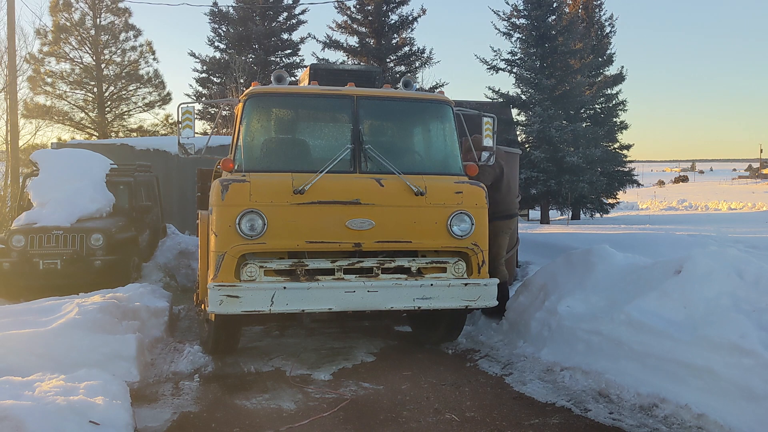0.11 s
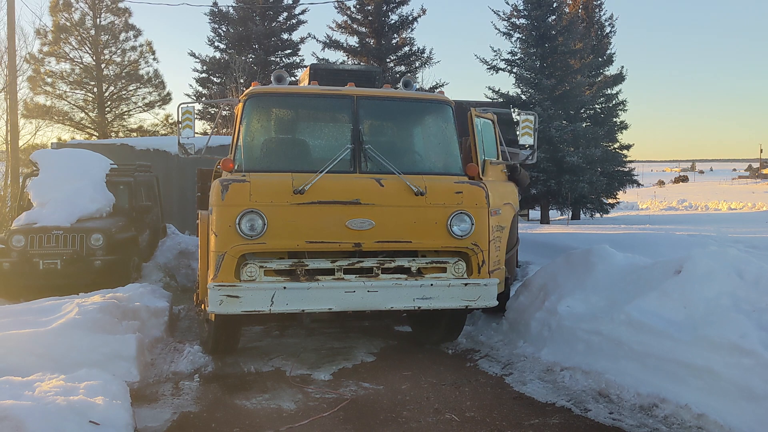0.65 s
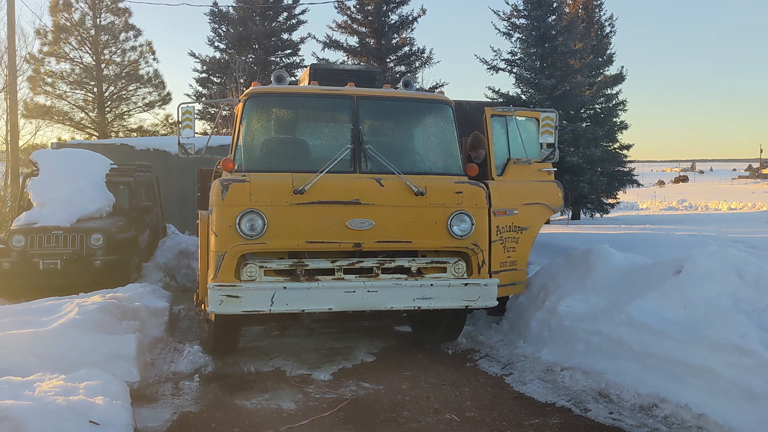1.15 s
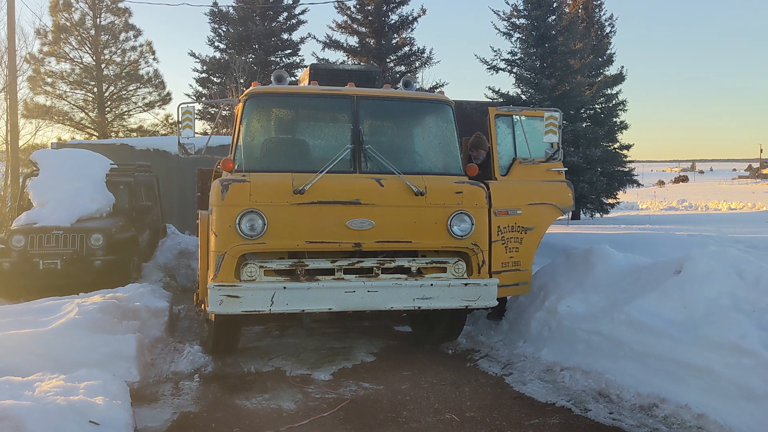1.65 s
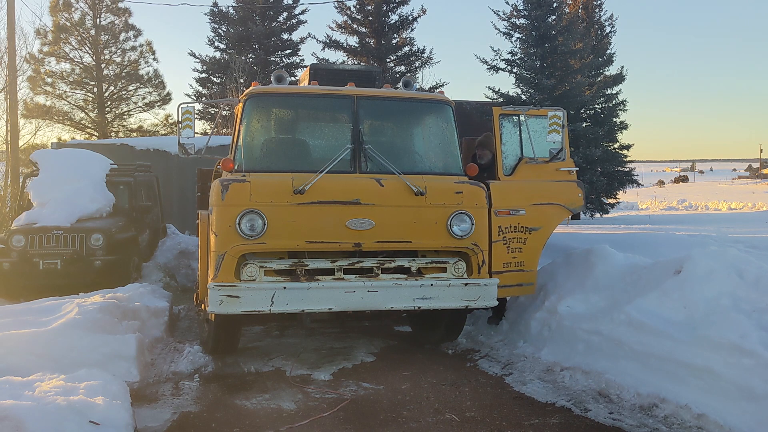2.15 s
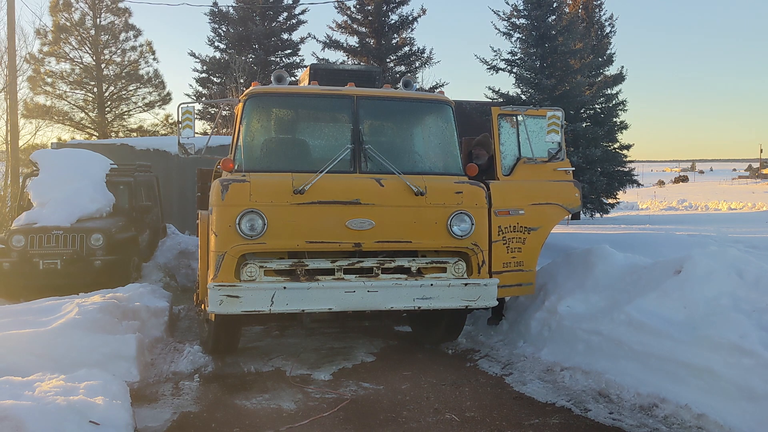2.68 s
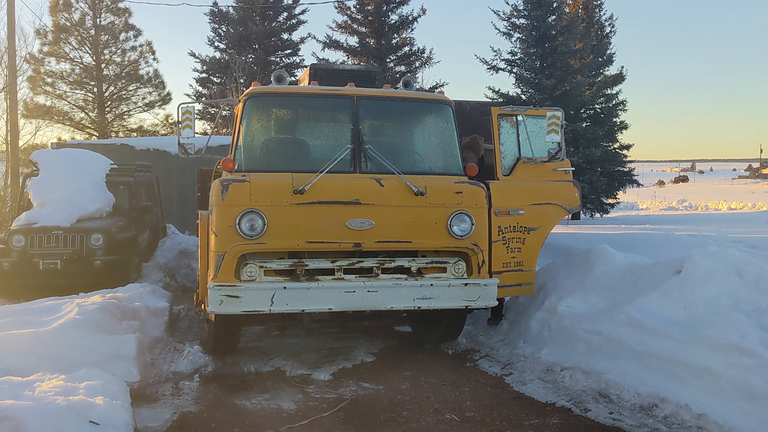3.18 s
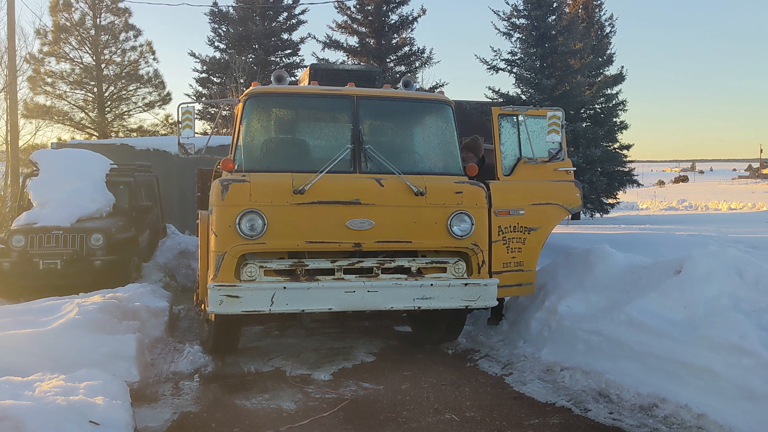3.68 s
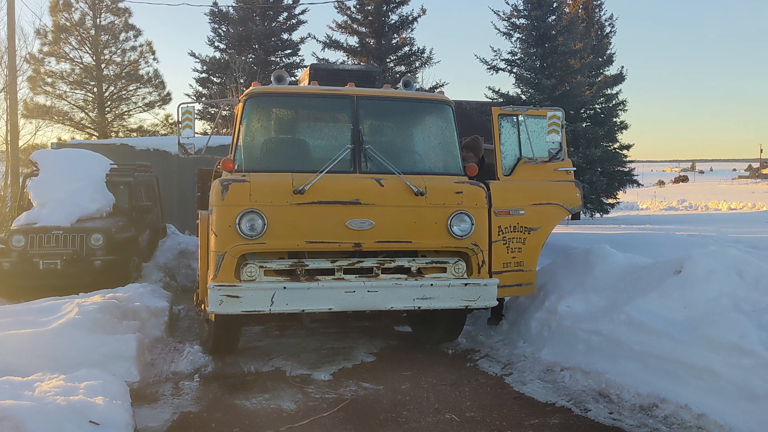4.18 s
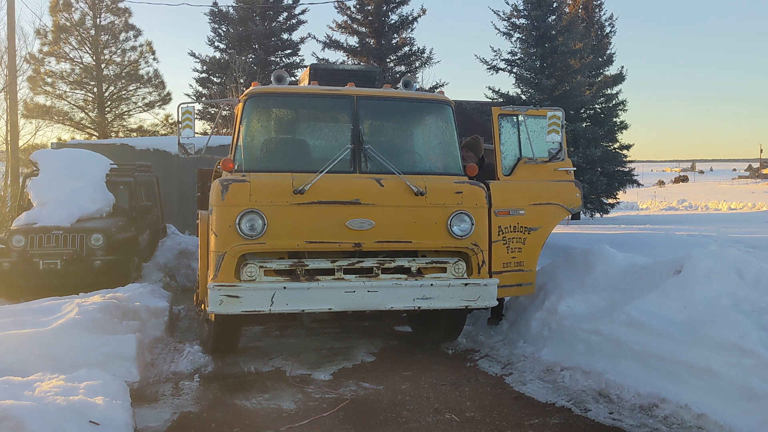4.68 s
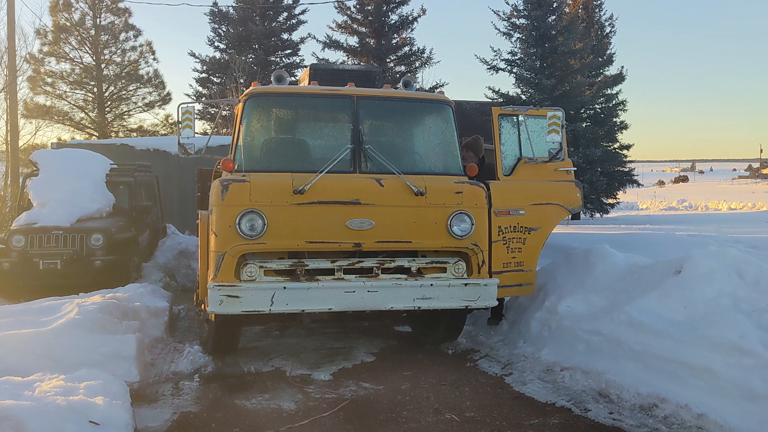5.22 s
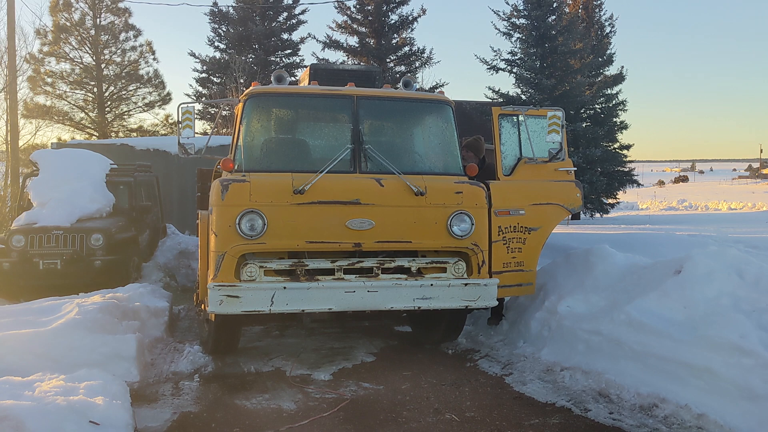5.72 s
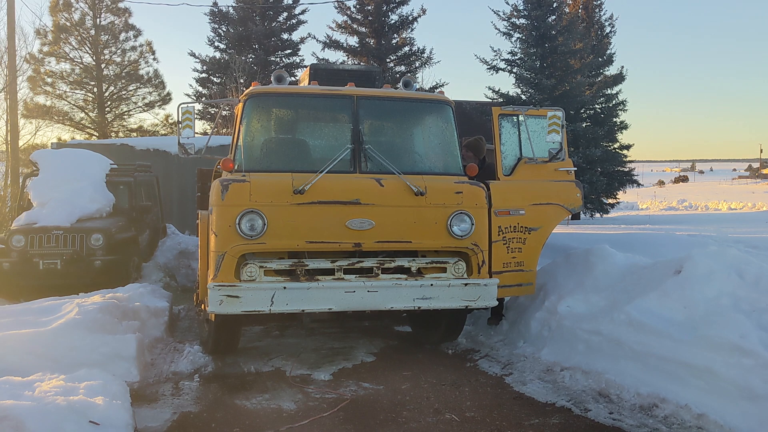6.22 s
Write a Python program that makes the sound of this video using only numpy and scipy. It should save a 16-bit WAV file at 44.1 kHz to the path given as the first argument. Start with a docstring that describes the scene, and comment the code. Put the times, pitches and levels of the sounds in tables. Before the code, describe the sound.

In a quiet winter yard, soft steps and a sheet-metal cab knock lead to sudden hissing air, a starter slam and rough, clattering diesel cranking.

```python
"""Cold diesel start in a winter yard

Boots crunch on frozen ground, then someone climbs into a truck cab; a small bird chips twice.
Showers of tiny impacts through resonances make the boots, cab and engine; gliding sines make the bird.
Air starts to hiss: noise through narrow resonances. The starter slams in with a short tone and hard
knocks, and the cold diesel turns over unevenly, with a falling first thump and trembling metal tones.
Behind it all lie a far rumble and a faint steady hiss, both made of filtered noise."""
import sys
import numpy as np
from scipy import signal
from scipy.fft import rfft, irfft
from scipy.io import wavfile

SR = 44100
rng = np.random.default_rng(int(sys.argv[2]) if len(sys.argv) > 2 else 0)


def decibels_to_gain(level_db):
    """Convert a level in decibels to a linear amplitude gain (20 dB per decade)."""
    exponent = np.asarray(level_db, float) / 20
    return 10 ** exponent


def inscribe(sig):
    """Save sig as 16-bit PCM at rate SR to the path in sys.argv[1].

    A 1-D sig is mono; a 2-D sig holds one channel per row.
    Samples are clipped to [-1, 1] before scaling.
    """
    pcm = np.round(np.clip(np.atleast_2d(sig).T, -1, 1) * 32767)
    wavfile.write(sys.argv[1], SR, pcm.astype(np.int16))


N = 280035
T = np.arange(N) / SR
HZ = np.maximum(np.arange(N // 2 + 1) * SR / N, 1)
QUARTER_TURN = [[0], [np.pi / 2]]   # phase offset [rad] between the two signals of a pair


def at_hz(points):
    """Reads a table at every frequency of the transform, along a logarithmic pitch scale."""
    hz, value = np.array(points).T
    return np.interp(np.log(HZ), np.log(hz), value)


def rms_one(x):
    """Scales a sound to an average strength (rms) of 1."""
    return x / np.sqrt(np.mean(x ** 2) + 1e-20)


def noise_pair():
    """Two unrelated white noises."""
    return rng.standard_normal((2, N))


def drift(rate_hz):
    """Slow random wandering of spread 1, worked out at every 40th sample."""
    r = np.exp(-2 * np.pi * rate_hz * 40 / SR)
    steps_of_chance = rng.standard_normal(N // 40 + 2002)
    slow = signal.lfilter([1], [1, -2 * r, r * r], steps_of_chance)[2000:]
    return np.interp(np.arange(N) / 40, np.arange(len(slow)), rms_one(slow))


def grains(per_s, spread_db):
    """Two unrelated showers of tiny impacts of uneven size."""
    hit = rng.random((2, N)) < per_s / SR
    size = decibels_to_gain(spread_db * np.minimum(rng.exponential(1, (2, N)), 4))
    return hit * size * noise_pair() + 1e-18


def band(x, low_hz, high_hz):
    """Keeps the sound between two pitches."""
    return signal.sosfilt(signal.butter(2, [low_hz, high_hz], "band", fs=SR, output="sos"), x)


def body(x, spectrum, rings, rings_db, waver_db):
    """Broad colour plus resonances; each resonance is driven with a wavering strength of its own."""
    broad = irfft(rfft(x) * decibels_to_gain(at_hz(spectrum)), N)
    ringing = 0
    for hz, width_hz, db in rings:
        r = np.exp(-np.pi * width_hz / SR)
        poles = [1, -2 * r * np.cos(2 * np.pi * hz / SR), r * r]
        gain = (1 - r * r) / 2
        driven = x * decibels_to_gain(db + waver_db * drift(4.7))
        ringing = ringing + signal.lfilter([gain, 0, -gain], poles, driven)
    return broad + decibels_to_gain(rings_db) * ringing


def bursts(start_s, level_db, rise_s, t60_s, held_s=0):
    """Power of blows that rise quickly, hold a moment and die away by 60 dB in t60_s."""
    power = np.zeros(N)
    for s, db, rise, t60, held in np.broadcast(start_s, level_db, rise_s, t60_s, held_s):
        i = max(int(np.ceil(s * SR)), 0)
        t = T[i:i + int((held + 2 * t60) * SR)] - s
        attack = 1 - np.exp(-t / max(rise, 1e-4))
        fade = decibels_to_gain(db - 60 * np.maximum(t - held, 0) / t60)
        power[i:i + len(t)] += (fade * attack) ** 2
    return power


def blows(s, low_db, mid_db, high_db, held, t60, sound, rise, low_longer, high_shorter):
    """Each blow sounds in three ranges, each with its own fade; the lows swell up more slowly."""
    s = s - .003   # the scrape of contact leads the blow
    low_power = bursts(s, low_db, 2 * rise, low_longer * t60, held)
    mid_power = bursts(s, mid_db, rise, 1.06 * t60, held)
    high_power = bursts(s, high_db, rise, high_shorter * t60, held)
    low = rms_one(band(sound, 94, 846)) * np.sqrt(low_power)
    mid = rms_one(band(sound, 627, 2630)) * np.sqrt(mid_power)
    high = rms_one(band(sound, 4000, 19845)) * np.sqrt(high_power)
    return low + mid + high


# the turning engine: (time [s], exhaust and block level [dB], gears and valves level [dB]),
# each range of pitch shifts these levels a little
ENGINE_TURNING = [(4.44, -55, -50), (4.5, -57, -37), (4.62, -34, -38), (4.75, -36, -33),
                  (4.898, -29.5, -30.5), (5.05, -40, -33.5), (5.18, -32, -33.5), (5.6, -31.5, -31.5),
                  (6.03, -30.5, -33), (6.35, -34, -30)]
# hard knocks: (time [s], block level [dB], exhaust level [dB], metal level [dB], basic t60 [s])
HARD_KNOCKS = [(4.406, -27.5, -58, -20.5, 0.12), (4.454, -30, -27, -13.5, 0.1), (4.47, -9, -25, -7.5, 0.16),
               (4.498, -12, -12.5, -12.5, 0.22), (4.522, -8.5, -12, -24, 0.095), (4.7, -28, -44, -31, 0.15),
               (4.794, -22, -46, -34, 0.13), (4.876, -12, -19, -15, 0.1), (4.957, -22.5, -22.5, -20, 0.21),
               (4.989, -23, -38, -16.5, 0.093), (5.064, -19.5, -20, -18.5, 0.16),
               (5.121, -21.5, -27, -21.5, 0.19), (5.237, -27, -26, -11.5, 0.071),
               (5.445, -14.5, -20, -13, 0.082), (5.529, -35, -43, -19, 0.13),
               (5.674, -20.5, -41, -14, 0.095), (5.729, -36, -29.5, -15, 0.14),
               (5.822, -15.5, -30, -14.5, 0.11), (5.891, -22, -18.5, -16.5, 0.12),
               (5.983, -17.5, -44, -24, 0.06), (6.023, -31, -34, -27.5, 0.69),
               (6.268, -17, -15, -19.5, 0.12), (6.31, -19, -15, -20, 0.12)]
# broad colour of the engine: (pitch [Hz], relative level [dB])
ENGINE_COLOUR = [(24, -35), (40, -7), (200, -8.5), (256, -0.5), (554, -2), (933, -4.5), (1020, -2.5),
                 (1250, -19), (1540, -5), (2310, -4.5), (2530, -12.5), (3250, -2), (3600, -4), (4500, -9),
                 (5590, -21.5), (7510, -37.5), (9000, -18.5), (11700, -25), (19800, -120)]
# engine resonances: (pitch [Hz], width [Hz], relative level [dB])
ENGINE_RESONANCES = [(70, 12, -4), (149, 32, -6), (229, 65, -1.5), (342.5, 19, 2.5), (375, 21, -31),
                     (484, 33, -8), (653, 100, -16.5), (1041, 17, 0), (1192, 96, -5), (1385, 16, -4),
                     (2289, 40, -4.5), (2677, 72, -10.5), (2907, 19, -2), (3926, 35, -0.5),
                     (4370, 260, -12), (4990, 97, -14)]


def engine():
    """Dense metal contacts drive the engine's resonances; knocks push each part harder for a moment."""
    sound = body(grains(5000, 2.8), ENGINE_COLOUR, ENGINE_RESONANCES, 2.5, 1.6)
    s, deep, gears = np.transpose(ENGINE_TURNING)
    deep_db, gears_db = np.interp(T, s, deep), np.interp(T, s, gears)
    at, block_db, exhaust_db, metal_db, t60 = np.transpose(HARD_KNOCKS)
    rattle_db = gears_db - 9.5 + 2.5 * (T - s[0])   # the rattle grows by 2.5 dB per second
    # exhaust, block, housing, valves, rattle:
    # (low [Hz], high [Hz], running [dB], flutter [dB], knock [dB], rise [s], t60 factor)
    parts = [(44.3, 273, deep_db - 0.1, 1.65, exhaust_db, 0.0084, 1.21),
             (292.5, 760, deep_db + 0.1, 2.9, block_db, 0.0031, 1.13),
             (974, 1470, gears_db + 0.1, 0.55, metal_db - 1.0, 0.0051, 0.68),
             (1750, 2846, gears_db - 0.6, 1.27, metal_db - 5.5, 0.0039, 0.8),
             (3100, 12200, rattle_db, 2.08, metal_db - 12.5, 0.0054, 1.06)]
    spinning = np.clip((T - s[0]) / .05, 0, 1)
    # 50 lighter taps at random moments shake the whole engine
    moment, strength = rng.random((50, 2)).T
    tap_s = s[0] + moment * (s[-1] - s[0])
    tap_db = 7 + 9 * (strength - 1)   # from -2 to 7 dB over the running level
    tapping = np.sqrt(1 + bursts(tap_s, tap_db, 0.0024, 0.07))
    out = 0
    for low_hz, high_hz, running_db, flutter_db, knock_db, rise, longer in parts:
        running = spinning * tapping * decibels_to_gain(running_db + flutter_db * drift(21.6))
        knocking = bursts(at, knock_db, rise, longer * t60)
        out = out + rms_one(band(sound, low_hz, high_hz)) * np.sqrt(running ** 2 + knocking)
    return out


# first exhaust beat: (time [s], pitch [Hz], level before a random waver [dB])
FIRST_BEAT = [(4.49, 307.7, -49), (4.511, 254, -25), (4.534, 213, -15), (4.571, 165, -22),
              (4.61, 133, -28.5), (4.67, 106, -44)]


def thump():
    """The first heavy beat falls in pitch as the exhaust empties: a sine and its octave."""
    s, hz, db = np.transpose(FIRST_BEAT)
    phase = 2 * np.pi * np.cumsum(np.interp(T, s, hz)) / SR
    beat = np.sin(phase) + 0.26 * np.sin(2 * phase + 0.81)
    level_db = np.interp(T, s, db, left=-120, right=-120) + 3.5 * drift(42.0)
    return decibels_to_gain(level_db) * beat * [[1], [1]]


# castings that sing on and off: one centre pitch [Hz] each
CASTING_HZ = [549, 1183, 1268, 2075, 3300]
# faint hum of each casting between its swells: level before wavering [dB]
CASTING_HUM_DB = [-40.5, -42.5, -39, -54, -52]
# swells, one list per casting: (loudest time [s], level before trembling [dB],
# time to change by 10 dB [s], never taken below 0.01)
CASTING_SWELLS = [
    [(4.5, -21.5, 0.0476), (4.97, -34.5, 0.063), (5.072, -33.5, 0.0735), (5.455, -25.5, 0.01),
     (5.81, -36.5, 0.0625), (6.34, -23, 0.026)],
    [(4.5, -30, 0.0743), (4.726, -31, 0.0719), (4.852, -41, 0.06), (5.684, -36, 0.06), (5.836, -36, 0.06),
     (5.904, -28, 0.0766), (6.03, -32.5, 0.0636)],
    [(4.5, -19.5, 0.0262), (4.62, -37, 0.0265), (4.74, -24.5, 0.0534), (4.91, -23.5, 0.0413),
     (5.18, -31, 0.1036), (5.71, -23, 0.0323), (5.93, -26, 0.04), (6.33, -26, 0.0277)],
    [(4.64, -32.5, 0.07), (4.81, -24, 0.0025), (4.966, -31, -0.01), (5.072, -26.5, -0.026),
     (6.2, -29, -0.09)],
    [(5.072, -41, 0.0628), (5.238, -39.5, 0.09), (5.57, -35, 0.0956), (5.784, -34.5, 0.0733),
     (5.936, -38, 0.1061), (6.3, -38, 0.13)],
]


def singing():
    """Castings as near-steady tones whose pitch and strength tremble; each hums and now and then swells."""
    out, turning = 0, T > ENGINE_TURNING[1][0]
    for hz, hum_db, swells in zip(CASTING_HZ, CASTING_HUM_DB, CASTING_SWELLS):
        phase = 2 * np.pi * np.cumsum(hz * (1 + .009 * drift(30.0))) / SR
        tremble = decibels_to_gain(3.2 * drift(50.0))
        level = turning * decibels_to_gain(hum_db + 5 * drift(17.5))
        for s, db, fade_s in swells:
            level = level + decibels_to_gain(db - 10 * np.abs(T - s) / max(fade_s, .01))
        out = out + level * tremble * np.sin(phase + QUARTER_TURN)
    return out


# the starter gear strikes the flywheel: (time [s], pitch [Hz], level [dB], rise [s], t60 [s])
STARTER_STRIKE = (4.406, 1268, -13, .008, .17)


def starter_bark():
    """The struck flywheel gives one steady tone that rises quickly and dies away."""
    at, hz, db, rise, t60 = STARTER_STRIKE
    return np.sqrt(bursts([at], db, rise, t60)) * np.sin(2 * np.pi * hz * T + QUARTER_TURN)


# escaping air: (time [s], level [dB])
AIR_LEVEL = [(3.76, -39), (3.95, -37.5), (4.4, -38.5), (5.2, -37), (6.35, -36.5)]
# broad colour of the hiss: pitches [Hz], and the relative level [dB] at each
AIR_COLOUR_HZ = [90, 160, 520, 1100, 2200, 3000, 4300, 6500, 7000, 8500, 8900, 10000, 12200, 12700, 14200,
                 15700]
AIR_COLOUR_DB = [-24, -5.5, -12, -3.5, -9.5, -13.5, -10.5, -12, -4.5, -2.5, -14, -15, -9, -25.5, -2.5, -9.5]
# narrow resonances of an opening and its pipe: pitches [Hz]
AIR_RESONANCE_HZ = [463, 640, 743, 1043, 1108, 1204, 1270, 1431, 1750, 2155, 3960, 5340, 6080, 7060, 7206,
                    7697, 8435, 9140, 10720, 12650, 13100, 13400, 13900]
# the same resonances in the same order: (width [Hz], relative level [dB])
AIR_RESONANCES = [(15.9, 2), (32.4, -1.5), (21.6, 2), (23.148, 2), (27, -1), (23.148, -6), (18.519, 3.5),
                  (18.3, 2.5), (32.4, -4), (27.778, 3.5), (88.5, -6), (54, -5.5), (40.741, -9.5),
                  (74.074, -2), (46.296, -3), (37.8, -2), (40, -3), (111.11, -10), (98, -17), (120, 0.5),
                  (70, -1), (90, 2), (159, -29)]


def air_hiss():
    """Smooth turbulence through the narrow resonances of a small opening and its pipe."""
    s, db = np.transpose(AIR_LEVEL)
    opening = np.clip((T - 3.756) / .009, 0, 1)   # opens at 3.756 s, within 9 ms
    colour = np.column_stack([AIR_COLOUR_HZ, AIR_COLOUR_DB])
    rings = np.column_stack([AIR_RESONANCE_HZ, AIR_RESONANCES])
    jet = body(noise_pair(), colour, rings, 2.2, 1.0)
    return rms_one(jet) * opening * decibels_to_gain(np.interp(T, s, db))


# bright puffs as the starter bites: (time [s], level [dB], rise [s], t60 [s])
STARTER_PUFFS = [(4.455, -27, 0.0016, 0.21), (4.484, -26, 0.015, 0.19)]


def puffs():
    """Short bursts of bright noise."""
    s, db, rise, t60 = np.transpose(STARTER_PUFFS)
    return rms_one(band(noise_pair(), 1700, 12600)) * np.sqrt(bursts(s, db, rise, t60))


# blows on the cab's sheet metal: (time [s], level [dB], weight [dB], basic t60 [s])
CAB_BLOWS = [(1.791, -65, 8, 0.11), (1.817, -27, -4.5, 0.15), (1.87, -22, -5, 0.12), (1.9, -43.5, 6, 0.24),
             (1.947, -57.5, 10, 0.083), (2.037, -51, 8, 0.087), (2.079, -53, -0.5, 0.18),
             (2.143, -55.5, 0.5, 0.12), (2.324, -66.5, 2, 0.078), (2.374, -49.5, 1, 0.12),
             (2.394, -56.5, -13, 0.089), (2.757, -56, 5, 0.13), (2.779, -61, -18, 0.12)]
# broad colour of the cab: (pitch [Hz], relative level [dB])
CAB_COLOUR = [(88, -49), (150, -18), (361, -5), (457, 0), (960, -9.5), (1420, -3.5), (1530, -10.5),
              (4580, -4), (5790, -14.5), (7180, -12.5), (10400, -18), (12400, -9.5), (16000, -22)]
# cab resonances: (pitch [Hz], width [Hz], relative level [dB])
CAB_RESONANCES = [(490, 320, 4.5), (1440, 30, -3), (2320, 48, -10), (3800, 97, -11), (4170, 180, -18.5),
                  (7100, 160, 0.5)]


def clunks():
    """Panels, latch and seat rattle for a moment after each blow: grains through the cab's resonances."""
    s, db, weight_db, t60 = np.transpose(CAB_BLOWS)
    low_db = db + weight_db
    high_db = db + 0.6 + 0.22 * weight_db   # heavy blows also rattle
    sound = body(grains(14000, 1.3), CAB_COLOUR, CAB_RESONANCES, -11.5, 3.1)
    return blows(s, low_db, db, high_db, 0.012, t60, sound, 0.0021, 1.23, 0.73)


# boots on frozen ground: (time [s], level [dB], brightness [dB], basic t60 [s])
BOOT_STEPS = [(0.004, -56, -7, 0.28), (0.048, -56.5, 1.5, 0.18), (0.119, -51, 0, 0.076),
              (0.284, -56, 0, 0.12), (0.306, -46.5, 2.5, 0.094), (0.329, -50.5, -1, 0.15),
              (0.459, -66, -1, 0.29), (0.788, -65.5, -4, 0.15), (0.839, -66, -2, 0.2),
              (1.126, -70.5, -12, 0.1), (2.849, -65, 4, 0.39), (3.064, -65.5, 6.5, 0.14),
              (3.569, -67.5, 1, 0.092)]
# broad colour of the crust: (pitch [Hz], relative level [dB])
CRUST_COLOUR = [(88, -32), (150, -11), (291, -10.5), (790, -3), (1120, -5.5), (1360, -10), (1690, -26),
                (2360, -3.5), (4760, -26), (13200, -33), (16000, -15)]
# resonances of the crust: (pitch [Hz], width [Hz], relative level [dB])
CRUST_RESONANCES = [(1435, 140, 5), (1810, 150, -2.5), (2230, 37, -8.5), (3170, 77, -3), (5160, 51, -29)]


def steps():
    """Crust breaks under the sole in a shower of grains."""
    s, db, bright_db, t60 = np.transpose(BOOT_STEPS)
    low_db = db - 2 - .3 * bright_db   # a brighter step has weaker lows
    high_db = db - 2.5 + bright_db
    sound = body(grains(6000, 2.4), CRUST_COLOUR, CRUST_RESONANCES, -7.0, 0.62)
    return blows(s, low_db, db, high_db, 0.017, t60, sound, 0.00094, 2.1, 1.0)


# clothes and seat rustle: (time [s], level before a random waver [dB])
CLOTH_LEVEL = [(0.0, -62), (0.118, -73), (0.96, -81), (1.8, -90), (1.97, -55), (2.04, -66), (2.58, -75.5),
               (3.0, -74.5), (3.21, -84), (3.75, -82)]


def rustle():
    """Soft, fine-grained friction of cloth."""
    s, db = np.transpose(CLOTH_LEVEL)
    level_db = np.interp(T, s, db, right=-120) + 2.1 * drift(42.0)
    return rms_one(band(grains(8000, 1.9), 885, 19845)) * decibels_to_gain(level_db)


# bird chips: (time [s], level [dB])
BIRD_CHIPS = [(3.042, -57), (3.115, -58)]
# shape of every chip: (time from its start [s], pitch [Hz], level added to the chip's own [dB])
BIRD_CHIP_SHAPE = [(0, 7400, -15), (.003, 6600, 1), (.006, 6500, -1), (.009, 7100, 5), (0.013, 8300, -3),
                   (0.017, 10000, -5), (.018, 10200, -41)]


def bird():
    """A sine that dips, then whips upward."""
    out, (dt, hz, db) = np.zeros(N), np.transpose(BIRD_CHIP_SHAPE)
    for s, level_db in BIRD_CHIPS:
        on = (T > s) & (T < s + dt[-1])
        phase = 2 * np.pi * np.cumsum(np.interp(T, s + dt, hz)) / SR
        out += on * decibels_to_gain(level_db + np.interp(T, s + dt, db)) * np.sin(phase)
    return out * [[1], [.5]]


# faint treble ticks: (time [s], level [dB])
TREBLE_TICKS = [(2.2877, -67), (2.578, -55), (2.596, -53), (2.6459, -62), (2.9053, -57), (2.9462, -63)]


def ticks():
    """Very short, very high ticks of noise."""
    s, db = np.transpose(TREBLE_TICKS)
    return rms_one(band(noise_pair(), 12300, 14400)) * np.sqrt(bursts(s, db, 0.00036, .012))


def echoes(x):
    """Trees, snow banks and a parked car scatter a short dull tail."""
    t60_s = 0.41
    t = T[:int(t60_s * SR)]
    fade = decibels_to_gain(-60 * t / t60_s) * (t > .012)   # silent for the first 12 ms
    tail = band(rng.standard_normal((2, len(t))), 158, 8300) * fade
    tail = tail / np.sqrt(np.sum(tail ** 2, axis=1, keepdims=True))
    return decibels_to_gain(-16) * signal.fftconvolve(x, tail, axes=1)[:, :N]


def heard(pair, alike, balance_db=0, lead_s=0):
    """Mixes a shared and an unshared signal into left and right, by their likeness at each pitch."""
    alike = np.clip(at_hz(alike), -1, 1)
    shared, apart = rfft(pair) * np.sqrt([(1 + alike) / 2, (1 - alike) / 2])
    # the left is balance_db louder and lead_s earlier than the right
    tilt = decibels_to_gain(balance_db / 2) * np.exp(1j * np.pi * HZ * lead_s)
    return irfft([(shared + apart) * tilt, (shared - apart) / tilt], N)


# colour of the yard: (pitch [Hz], relative level [dB])
YARD_COLOUR = [(18, -37.5), (30, -8.5), (98, 2.5), (134, -6), (319, -28.5), (702, -25), (937, -30.5),
               (1350, -26), (1630, -32.5), (2290, -27.5), (2610, -31), (7270, -32.5), (10500, -39.5),
               (12000, -37), (16000, -31.5)]
# level of the far rumble, as a gain on the lows of the yard noise: (time [s], level [dB])
RUMBLE_LEVEL = [(0.0, -68.5), (0.5, -61), (1.63, -68), (1.93, -58), (2.21, -65.5), (2.8, -64), (4.3, -65.5)]
# left-right likeness of the yard: (pitch [Hz], likeness [-1 to 1])
YARD_LIKENESS = [(60, 0.99), (180, 0.91), (550, 0.091), (1650, 0.12), (4970, -0.16), (15000, 0.097)]


def yard():
    """Far rumble that swells and sinks, over faint steady hiss: noise split at 260 Hz."""
    noise = rms_one(irfft(rfft(noise_pair()) * decibels_to_gain(at_hz(YARD_COLOUR)), N))
    low = signal.sosfilt(signal.butter(2, 260, fs=SR, output="sos"), noise)
    high = signal.sosfilt(signal.butter(2, 260, "high", fs=SR, output="sos"), noise)
    s, db = np.transpose(RUMBLE_LEVEL)
    return heard(decibels_to_gain(np.interp(T, s, db)) * low - decibels_to_gain(-58.5) * high, YARD_LIKENESS)


# left-right likeness of the near sounds: (pitch [Hz], likeness [-1 to 1])
NEAR_LIKENESS = [(60, 1.0), (300, 0.98), (700, 0.89), (1400, 0.9), (3000, 0.92), (7000, 0.11),
                 (15000, 0.11)]
# how much louder the near sounds are on the left: (pitch [Hz], level [dB])
NEAR_LEFT_OVER_RIGHT = [(200, 0), (380, 2), (700, 1), (1290, 4), (2380, 4.5), (4400, 8), (8120, 9.5),
                        (15000, 5)]


def scene():
    """Near sounds with their echoes, the singing tones without, and the yard behind."""
    truck = engine() + thump() + air_hiss() + puffs() + clunks()
    noisy = truck + steps() + rustle() + bird() + ticks()
    near = noisy + echoes(noisy) + singing() + starter_bark()
    return heard(near, NEAR_LIKENESS, at_hz(NEAR_LEFT_OVER_RIGHT), 6.5e-5) + yard()


def roll_off(x):
    """The treble ends steeply here."""
    return signal.sosfilt(signal.butter(12, 16460, fs=SR, output="sos"), x)


def record(dry):
    """The microphone drops the deepest bass and rounds the peaks; the top is cut steeply."""
    no_bass = signal.sosfilt(signal.butter(3, 42, "high", fs=SR, output="sos"), dry)
    rounded = .8 * np.tanh(no_bass / .8)
    mix = signal.sosfilt(signal.ellip(10, .5, 60, 15740, fs=SR, output="sos"), rounded)
    return roll_off(mix)


dry = scene()
out = record(dry)
inscribe(out)
```